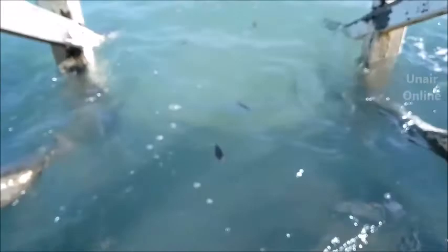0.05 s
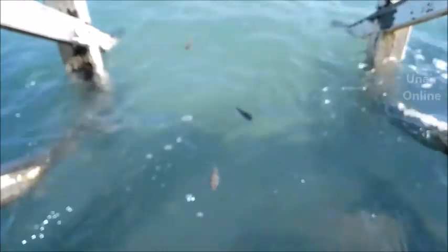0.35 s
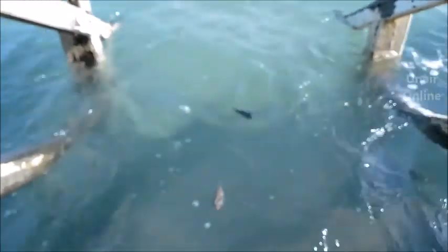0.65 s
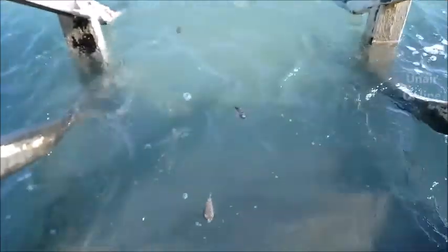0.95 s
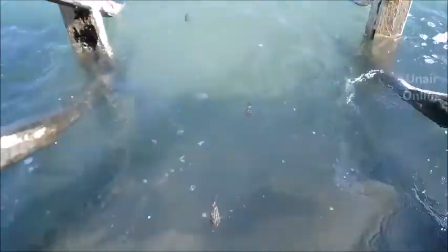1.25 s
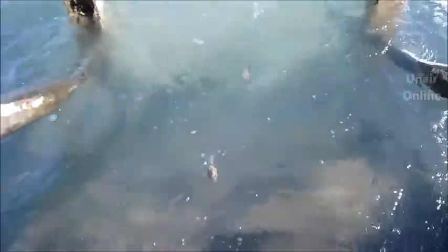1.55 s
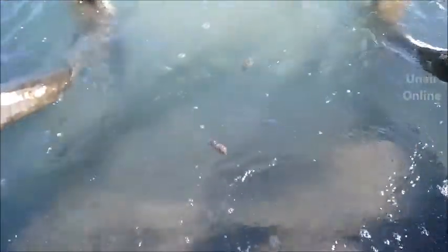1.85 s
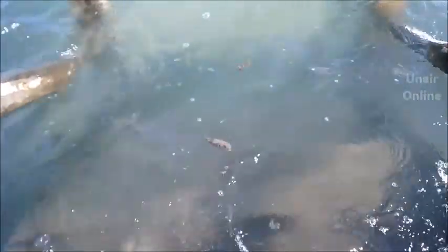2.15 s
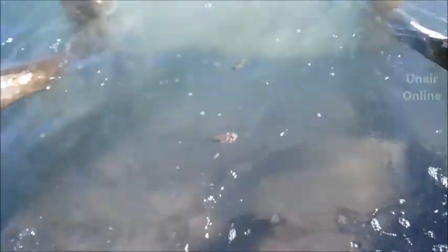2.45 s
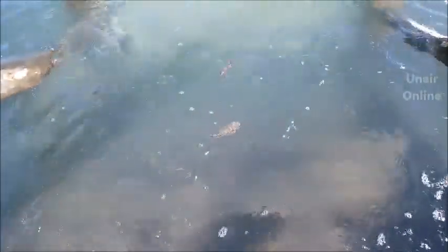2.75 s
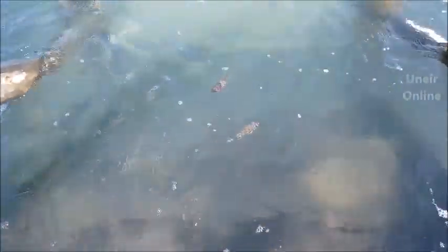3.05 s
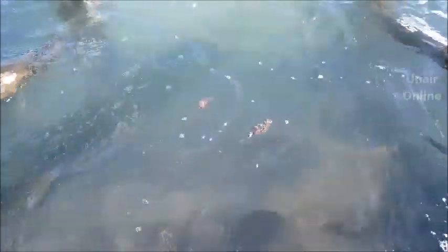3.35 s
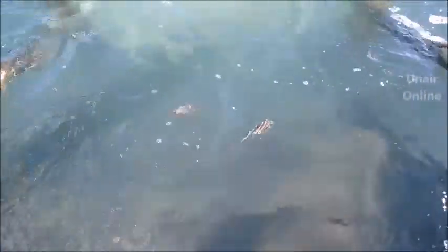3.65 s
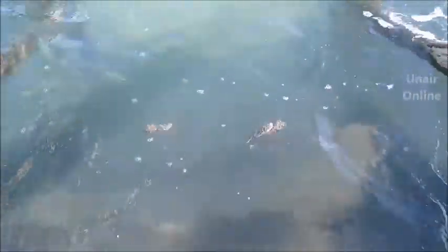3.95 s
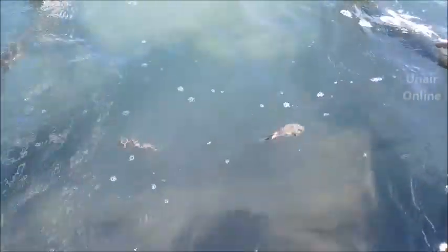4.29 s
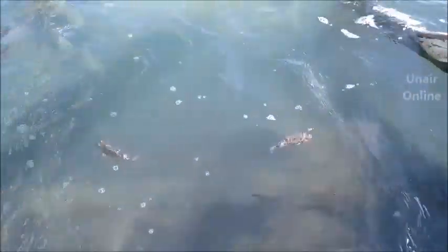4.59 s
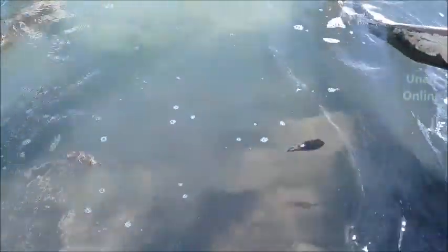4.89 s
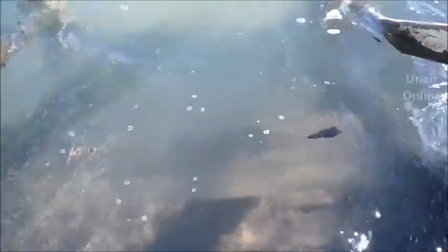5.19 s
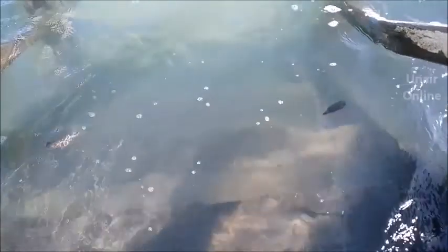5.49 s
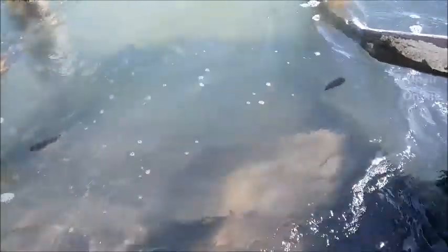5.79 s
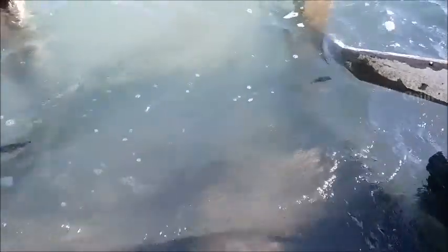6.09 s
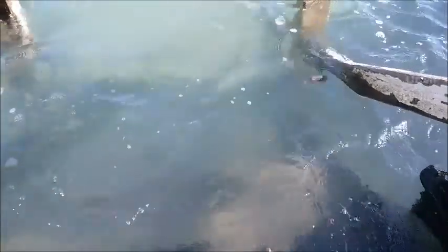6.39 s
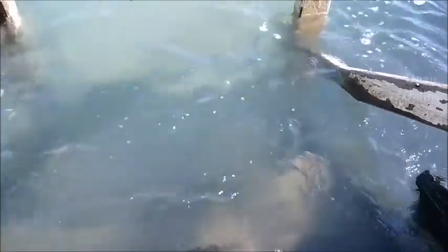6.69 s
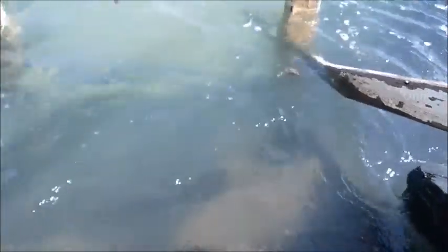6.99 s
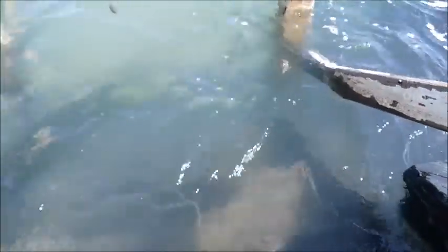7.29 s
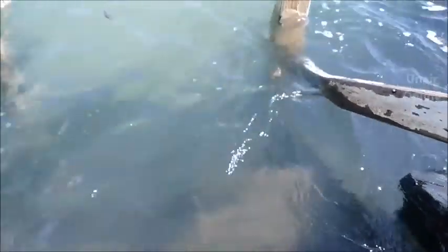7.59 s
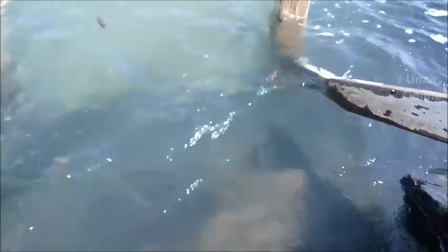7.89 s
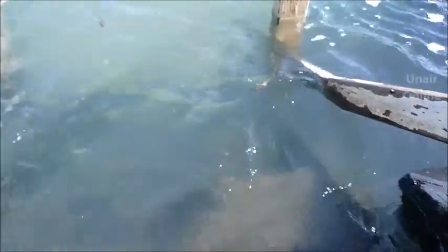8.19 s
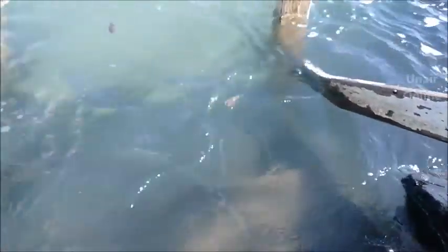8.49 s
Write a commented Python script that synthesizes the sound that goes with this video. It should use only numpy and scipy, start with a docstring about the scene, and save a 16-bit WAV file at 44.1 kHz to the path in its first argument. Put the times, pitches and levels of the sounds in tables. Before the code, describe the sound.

A wave washes around the wooden posts of a jetty, splashing and churning with sharp slaps, bubbly plops and a brief dull rumble. It drains away in fizzing foam after about two seconds. The sea then laps and trickles much more quietly, with small crests slapping the timber, gurgles and ticking drops. The water sounds close, with a short echo under the deck.

```python
"""A wave under a wooden jetty

A wave breaks around the posts, churns and drains away in fizzing foam. Then the sea laps and trickles:
small crests slap the timber, trapped air plops and gurgles, and spray drops tick.
Most of the sound is ringing bubbles, big ones low and small ones high. The deck echoes briefly."""
import sys
import numpy as np
from scipy import signal
from scipy.fft import rfft, irfft, next_fast_len
from scipy.io import wavfile
from scipy.ndimage import map_coordinates

SR = 44100
rng = np.random.default_rng(int(sys.argv[2]) if len(sys.argv) > 2 else 0)


def bounce(signal):
    """Save signal as a 16-bit WAV file at the path given by the first command-line argument."""
    frames = np.transpose(np.atleast_2d(signal))
    limited = np.clip(frames, -1, 1)
    pcm = np.round(limited * 32767).astype(np.int16)
    wavfile.write(sys.argv[1], SR, pcm)


N = 381024  # samples: 8.64 s


def amp(db):
    """Turn decibels into a gain to multiply by."""
    return 10 ** (np.asarray(db) / 20)


def unit(x):
    """Scale a sound to an average (rms) level of 1."""
    return x / np.sqrt(np.mean(x ** 2) + 1e-20)


def fade(t, fade_s):
    """Die away by 60 dB in fade_s seconds, the fade time."""
    return np.exp(-np.log(1000) * t / fade_s)


def along(points, hz):
    """Read between (frequency, value) points, with octaves evenly spaced."""
    frequencies, values = np.transpose(points)
    return np.interp(np.log(hz + 1), np.log(frequencies + 1), values)


def curves(rows):
    """Turn each column after the time into one value per sample."""
    times, *columns = np.transpose(rows)
    return [np.interp(np.arange(N) / SR, times, column) for column in columns]


def wobble(per_second):
    """A smooth curve through this many random values a second."""
    values = rng.standard_normal(int(N * per_second / SR) + 4)
    return map_coordinates(values, [np.arange(N) * per_second / SR])


def filtered(x, response):
    """Multiply each frequency in a sound by the gain response(hz)."""
    size = next_fast_len(len(x) + SR // 8)
    return irfft(rfft(x, size) * response(np.fft.rfftfreq(size, 1 / SR)), size)[:len(x)]


def coloured(x, tone):
    """Shape a sound with a table of frequencies and levels, then scale it to level 1."""
    return unit(filtered(x, lambda hz: amp(along(tone, hz))))


def without_bass(x, corner_hz=330):
    """Cut the bass, so splashes sound light and have no low thud."""
    return filtered(x, lambda hz: hz ** 4 / (hz ** 4 + corner_hz ** 4))


def add(track, start_s, sound):
    """Mix a sound into the track at the given time."""
    part = track[max(0, round(start_s * SR)):][:len(sound)]
    part += sound[:len(part)]


def ring(t, hz, fade_s, rise, onset_cycles):
    """A bubble swells, fades, and climbs about `rise` octaves per fade time as it nears the surface."""
    age = np.minimum(t / fade_s, 2)
    swell = 1 - np.exp(-(t * hz / onset_cycles) ** 2)
    return swell * fade(age, 1) * np.sin(2 * np.pi * hz * t * 2 ** (rise * age / 2))


def swarm(count, low_hz, high_hz, cycles, spread_db, rise, samples):
    """Bubbles of random pitch, life and strength, scattered over the whole scene."""
    when, pitch, life, strength, climb = rng.random((count, 5)).T[:, :, None]
    hz = low_hz * (high_hz / low_hz) ** pitch
    fade_s = cycles * 2 ** (2 * life - 1) / hz
    gain = amp(spread_db * np.minimum(-np.log(1 - strength), 4)) * hz
    rings = gain * ring(np.arange(samples) / SR, hz, fade_s, rise * climb, onset_cycles=0.79)
    positions = (when * N).astype(int) + np.arange(samples)
    return unit(np.bincount(positions.ravel(), rings.ravel(), N)[:N])


def froth(bubbles, tone, wash_db, flutter_db):
    """Distinct bubbles over a noisy wash of countless small ones, arriving in clumps."""
    wash = amp(wash_db)
    mix = coloured(bubbles, tone) + wash * coloured(rng.standard_normal(N), tone)
    mix /= np.sqrt(1 + wash ** 2)  # keeps the level steady as the wash changes
    return unit(mix * amp(flutter_db * wobble(70)))


def breaker(level_db, drained_s, steepness, crest_s=0.4, slosh_s=0.61):
    """Gain of a wave layer: it swells, sloshes and sags, and drains 20 dB more by drained_s."""
    t = np.arange(N) / SR
    swell_db = -10 * np.maximum(1 - t / crest_s, 0)
    sag_db = -2.5 * np.maximum(t - crest_s, 0)
    slosh_db = 0.57 * np.cos(2 * np.pi * (t - crest_s) / slosh_s)  # rocking between the posts
    drain_db = -20 * np.minimum(t / drained_s, 2) ** steepness
    return amp(level_db + swell_db + sag_db + slosh_db + drain_db)


# How long the echo under the deck lasts: (frequency [Hz], fade time [s])
DECK_FADES = [(200, 0.48), (2000, 0.28), (6000, 0.41), (14000, 0.042)]
def deck_echo(x, delay_s=0.006):
    """Sound bounces briefly between the water and the planks."""
    hz, t, bands = signal.stft(rng.standard_normal(SR // 2), SR, nperseg=256)
    tail = signal.istft(bands * fade(t, along(DECK_FADES, hz)[:, None]), SR, nperseg=256)[1]
    delayed = np.pad(x, (round(delay_s * SR), 0))
    return signal.fftconvolve(delayed, tail / np.linalg.norm(tail))[:N]


# The weight of the water against the posts: (time [s], level [dB])
SURGE = [(0.0, -77), (0.55, -75.5), (1.23, -59), (1.32, -75), (1.76, -71), (1.95, -81), (4.3, -85),
         (4.7, -75), (5.1, -87), (8.64, -91)]
# The deep tone of that push: (frequency [Hz], relative level [dB])
RUMBLE_TONE = [(20, 2), (45, -0.5), (70, 11.5), (125, 13.5), (200, -22), (400, -27)]
def rumble(heave_db=2.8):
    """Moving water pushes on the posts with a dull rumble."""
    level_db = curves(SURGE)[0] + heave_db * wobble(14)
    return amp(level_db) * coloured(rng.standard_normal(N), RUMBLE_TONE)


# The tone of the finest foam: (frequency [Hz], relative level [dB])
SIZZLE_TONE = [(5000, -40), (8000, -26), (10000, -15.5), (11300, 5), (12100, 6), (13200, -5),
               (16000, -13.5)]
def sizzle():
    """The finest foam goes on sizzling just after the wave's spray has fallen."""
    bursts = swarm(9000, low_hz=9650, high_hz=14200, cycles=30, spread_db=5.5, rise=0.1, samples=150)
    foam = froth(bursts, SIZZLE_TONE, wash_db=3, flutter_db=2.5)
    return foam * breaker(level_db=-35, drained_s=1.68, steepness=24)


def drips(below_ripples_db=9):
    """Water running off the posts plinks, louder when the ripples are higher."""
    plinks = swarm(150, low_hz=481, high_hz=3400, cycles=28, spread_db=2, rise=0.86, samples=3600)
    return plinks * amp(curves(LAPPING)[0] - below_ripples_db)


# Drops landing close by: (time [s], relative peak level [dB])
DROPS = [(2.705, -34), (2.792, -25), (2.9448, -31), (4.2127, -26), (4.274, -10), (4.282, -20),
         (4.5265, -17), (4.646, -30), (5.232, -26), (6.3715, -24.5), (6.3919, -18.5), (6.6543, -32),
         (7.1957, -29)]
def drops(tick_hz=12200, fade_s=0.0016):
    """Each drop lands with a tiny bright tick and a puff of spray."""
    out, t = np.zeros(N), np.arange(SR // 100) / SR
    for start_s, db in DROPS:
        hz = tick_hz * np.exp(0.017 * rng.standard_normal())
        tick = ring(t, hz, fade_s, rise=0.11, onset_cycles=0.3)
        tick += 0.15 * coloured(rng.standard_normal(len(t)), SPRAY_TONE) * fade(t, 2 * fade_s)
        add(out, start_s, amp(db) * tick / np.abs(tick).max())
    return out


# Escaping air: (time [s], length [s], level [dB], first pitch [Hz], last pitch [Hz])
GURGLES = [(0.739, 0.15, -33, 270.5, 277), (1.802, .14, -39.5, 400, 430), (2.547, 0.063, -47.5, 1000, 1360),
           (2.897, 0.079, -55.5, 360, 490), (4.287, .09, -45, 710, 780), (4.53, 0.27, -56.5, 315, 271)]
def gurgles(per_second=110, pitch_scatter=0.162, cycles=18):
    """A pocket of air breaks into a quick run of bubbles of about one size."""
    out, t = np.zeros(N), np.arange(SR // 8) / SR
    for start_s, length_s, db, first_hz, last_hz in GURGLES:
        run, count = np.zeros(SR), max(2, round(length_s * per_second))
        for k, (late, detune, strength) in enumerate(rng.standard_normal((100, 3))[:count]):
            progress = (k + 0.269 * late) / count
            hz = first_hz * (last_hz / first_hz) ** progress * np.exp(pitch_scatter * detune)
            bubble = ring(t, hz, cycles / hz, rise=0.19, onset_cycles=6.5)
            add(run, progress * length_s, amp(2 * strength) * bubble)
        add(out, start_s, amp(db) * unit(run) * np.sqrt(length_s))
    return out


# Notes of the gap between water and beam: (pitch [Hz], width [Hz], relative level [dB])
GAP_NOTES = [(2300, 320, 1), (3340, 290, -6)]
def gap_ring(x, fade_s=0.59):
    """The narrow gap between water and beam rings on after each pop."""
    def peaks(hz):
        return sum(amp(db) / (1 + (2 * (hz - pitch) / width) ** 2) for pitch, width, db in GAP_NOTES)
    t = np.arange(SR // 3) / SR
    tail = filtered(rng.standard_normal(len(t)), peaks) * fade(t, fade_s)
    return signal.fftconvolve(x, tail / np.linalg.norm(tail))[:N]


# Air pinched against the timber: (time [s], peak level [dB], pitch [Hz], fade time [s])
POPS = [(.352, -12.5, 3050, 0.018), (.925, -16, 3360, .03), (2.018, -38, 3260, 0.029),
        (2.304, -36, 2400, .02), (2.502, -39, 3180, 0.037), (3.576, -22, 3770, 0.02),
        (3.662, -38, 1730, 0.037), (4.056, -35, 2580, 0.05), (4.082, -34, 2770, 0.033),
        (4.236, -24, 2190, .018), (4.256, -27, 2810, 0.017), (4.429, -22, 2100, 0.032),
        (4.502, -19.5, 2080, 0.012), (4.526, -21, 3170, 0.015), (6.171, -38, 3150, 0.03)]
def pops(roughness=0.11):
    """Air caught between a ripple and the timber pops with a short, hollow note."""
    out, t = np.zeros(N), np.arange(SR // 10) / SR
    for start_s, db, hz, fade_s in POPS:
        note = ring(t, hz, fade_s, rise=0.077, onset_cycles=3.5)
        add(out, start_s, amp(db) * note / np.abs(note).max())
    return out * (1 + roughness * wobble(400))


# Single bubbles close by: (time [s], peak level [dB], pitch [Hz], rise [octaves per fade time])
PLOPS = [(.389, -13.5, 2410, 0.85), (.409, -21, 686, 0.22), (.456, -7.5, 1625, 0.15),
         (.495, -27.5, 430, .1), (.537, -14.5, 865, 0.1), (.568, -23, 727, 0.22), (.608, -21, 715, 0.34),
         (.770, -20, 700, 0.12), (.836, -23, 680, .3), (.848, -27, 341, .2), (1.192, -26.5, 254, 0.1),
         (1.221, -21, 1006, 0.19), (1.455, -29.5, 440, .1), (1.586, -27, 314, 0.11), (2.203, -43, 1480, .4),
         (2.593, -39.5, 783, 0.17), (2.991, -32.5, 762, 0.55), (4.23, -33, 745, 0.07),
         (4.384, -35.5, 750, .1), (4.555, -45, 315, .1), (4.611, -39, 264, .1), (4.704, -45, 258, .1),
         (4.793, -45, 317, .1), (4.815, -44.5, 228, .1), (4.9, -44, 1000, .15), (5.216, -29, 5400, 0.037),
         (5.230, -36, 447, 0.2), (5.254, -35.5, 492, 0.53), (5.478, -45, 567, 0.095),
         (5.574, -41, 946, 0.28), (6.389, -33.5, 557, 0.16), (6.438, -29, 588, 0.25),
         (6.717, -44, 1260, 0.57), (6.917, -43, 787, 0.67), (7.234, -46.5, 354, .1),
         (7.363, -37.5, 930, 0.17)]
def plops(roughness=0.29, longest_fade_s=0.087, big_bubble_hz=610):
    """Bubbles ring one by one, wobbling as they change shape; small, high ones die sooner."""
    out, t = np.zeros(N), np.arange(SR // 4) / SR
    for start_s, db, hz, rise in PLOPS:
        fade_s = longest_fade_s * min(1, big_bubble_hz / hz)
        bubble = ring(t, hz, fade_s, rise, onset_cycles=2.3)
        add(out, start_s, amp(db) * bubble / np.abs(bubble).max())
    return out * (1 + roughness * wobble(210))


def off_post(x, delay_s=0.0016, reflection_db=-8):
    """A sound together with its bounce off the nearest post."""
    return x + amp(reflection_db) * np.pad(x, (round(delay_s * SR), 0))[:N]


# Steady notes that ring in every slap: (pitch [Hz], width [Hz], relative level [dB])
SLAP_NOTES = [(740, 170, 15), (1060, 100, 0), (1563, 124, 11.5), (2140, 210, 8.5), (3260, 80, -2),
              (3800, 680, 2.5), (5500, 740, 10.5)]
def air_pocket(noise, pocket_hz, width_octaves, bass_cut_hz=450):
    """Shattered air makes a band of noise, coloured by a set of steady ringing notes."""
    def response(hz):
        band = 1 / np.sqrt(1 + np.abs(np.log2((hz + 1) / pocket_hz) / width_octaves) ** 4.84)
        ringing = sum(amp(db) ** 2 / (1 + (2 * (hz - pitch) / width) ** 2)
                     for pitch, width, db in SLAP_NOTES)
        bass_cut = hz ** 6 / (hz ** 6 + bass_cut_hz ** 6)
        return band * np.sqrt(0.51 + ringing) * bass_cut  # 0.51 is the power that arrives directly
    return unit(filtered(noise, response))


# Crests hitting the timber: (time [s], relative smack level [dB], air pocket pitch [Hz],
# pocket band width [octaves], relative spray level [dB], fade time [s])
SLAPS = [(.108, -13, 2120, 0.69, -25.5, 0.22), (.125, -15, 2400, 1, -12.5, 0.092),
         (0.187, -5, 2400, 0.48, -13, 0.1), (.21, -16, 2100, 0.49, -12.5, 0.059),
         (.349, -7, 2630, 0.67, -13, 0.075), (.368, -5.5, 1800, 1, -11, 0.035),
         (.541, -5, 2100, 0.28, -15, 0.059), (.61, -12, 1900, .5, -26, 0.044),
         (.762, -8, 1890, 0.56, -12, 0.045), (0.926, -11, 2430, 0.55, -21, 0.23),
         (1.029, -9.5, 2400, 0.51, -16, 0.12), (3.201, -24.5, 3040, 0.42, -33.5, 0.051),
         (3.556, -25.5, 1750, 0.47, -35, 0.16), (3.556, -23, 3850, 0.15, -51, 0.057),
         (3.57, -24, 950, 0.42, -42, 0.038), (3.576, -15, 3720, 0.14, -26.5, 0.064),
         (3.576, -17, 2400, 0.22, -42, 0.066), (3.606, -31, 1980, .35, -42, 0.29),
         (3.881, -49, 1840, .5, -34.5, 0.031), (4.044, -22.5, 1740, 0.87, -33, 0.087),
         (4.2, -33.5, 1800, 0.76, -36, 0.21), (4.222, -26, 1850, 0.69, -29, .04),
         (4.227, -12, 1540, 0.73, -29, 0.061), (4.254, -13, 2600, 0.26, -25, 0.038),
         (4.266, -19, 3320, 0.27, -29, 0.047), (4.272, -23, 1100, 0.88, -19, 0.04),
         (4.302, -29, 4100, 0.14, -29, .045), (4.429, -15.5, 1550, 0.79, -35, 0.051),
         (4.502, -17, 2560, 0.29, -31, 0.037), (4.566, -20.5, 1900, 0.35, -37, 0.079),
         (4.582, -27.5, 1240, 0.32, -50, 0.044), (4.71, -22.5, 2080, 0.37, -45, 0.16),
         (5.208, -29, 2260, 0.94, -33, 0.06), (5.225, -22.5, 1200, 1, -21.5, 0.03),
         (6.183, -32, 2100, .5, -31, 0.057), (6.385, -22.5, 1660, 0.25, -25.5, 0.023),
         (6.492, -29.5, 1850, .25, -45, 0.081), (6.548, -25, 2300, 0.38, -39.5, 0.074),
         (6.633, -30, 1800, .3, -42, .07), (7.361, -26, 1170, 0.4, -31.5, 0.065),
         (7.525, -37, 1210, 0.5, -59, 0.054), (7.793, -40, 1780, 0.46, -51, .07),
         (8.18, -43.5, 850, 1, -58, 0.15), (8.57, -35.5, 1730, .35, -50, 0.064)]
def slaps(smack_attack_s=0.00096, spray_attack_s=0.0018, smack_gain_db=-9, spray_gain_db=-2, grain_db=5):
    """Each crest shatters a pocket of air against the wood; spray follows and water spatters back."""
    out, t = np.zeros(N), np.arange(SR // 4) / SR
    spatter = amp(-17) * fade(t, fade_s=0.11)
    for start_s, smack_db, pocket_hz, width_octaves, spray_db, fade_s in SLAPS:
        air, mist = rng.standard_normal((2, len(t)))
        pocket = air_pocket(air, pocket_hz, width_octaves)
        droplets = coloured(mist * amp(grain_db * rng.standard_normal(len(t))), SPRAY_TONE)
        burst = fade(t, fade_s)
        smack = pocket * (1 - np.exp(-t / smack_attack_s)) * np.hypot(burst, spatter)
        fizz = droplets * (1 - np.exp(-t / spray_attack_s)) * burst
        add(out, start_s, amp(smack_db + smack_gain_db) * smack + amp(spray_db + spray_gain_db) * fizz)
    return out


def tumble():
    """Inside the breaking wave, lumps of water fall back with short, distinct glugs."""
    glugs = swarm(640, low_hz=463, high_hz=1710, cycles=14.4, spread_db=0.5, rise=0.37, samples=2400)
    return without_bass(glugs) * breaker(level_db=-33, drained_s=1.86, steepness=4)


def backwash(level_db=-35, peak_s=1.707, spread_s=0.035):
    """Gain of the last gush, as the spent wave pours back off the timber."""
    return amp(level_db - np.minimum(((np.arange(N) / SR - peak_s) / spread_s) ** 2, 100))


# Tones of large, medium, small and tiny bubbles: (frequency [Hz], relative level [dB])
CHURN_TONE = [(130, -62), (180, -15), (245, -4.5), (330, 0.5), (560, 0.5), (750, -9.5), (1200, -6),
              (2500, -66)]
SPLASH_TONE = [(60, -82), (300, -26.5), (550, -3), (780, -2), (1100, -2), (1650, -0.5), (2300, -2.5),
               (3200, -18.5), (4500, -43), (7000, -42)]
TRICKLE_TONE = [(300, -83), (1500, -28), (2400, 0.5), (3100, -1.5), (3900, -2), (4700, -7.5), (6000, -9.5),
                (9000, -59.5)]
SPRAY_TONE = [(300, -79), (3000, -10.5), (5000, -12.5), (7000, -9.5), (9000, -7), (10500, -3.5),
              (12000, -1), (13500, -5), (16000, -13)]
# The sea lapping after the wave: (time [s], relative ripple level [dB], relative foam level [dB])
LAPPING = [(1.95, -49, -47.5), (2.68, -53, -51), (3.08, -51, -51), (3.37, -54, -52.5), (4.05, -53, -51.5),
           (4.43, -51.5, -50), (4.78, -53, -55.5), (5.25, -53.5, -52.5), (5.69, -52.5, -49.5),
           (5.96, -50, -50.5), (6.23, -50.5, -49), (6.74, -51.5, -49.5), (7.24, -50.5, -52),
           (7.48, -53.5, -56.5), (8.23, -63, -59.5), (8.64, -59.5, -58)]
def wave_and_lapping():
    """Big bubbles churn, smaller ones splash and trickle, spray fizzes; the finest drain away first."""
    ripples_db, foam_db = curves(LAPPING)
    calm, = curves([(1.7, 0.37), (2.1, 1)])  # as the wave drains, single bubbles stand out
    stir_db = wobble(30) * (0.37 + 0.94 * calm)

    large = swarm(1300, low_hz=228.6, high_hz=924, cycles=59, spread_db=3.5, rise=0.86, samples=3600)
    medium = swarm(2000, low_hz=658.5, high_hz=3148, cycles=47.6, spread_db=2, rise=0.93, samples=1800)
    small = swarm(1900, low_hz=2169, high_hz=7110, cycles=78, spread_db=2.5, rise=0.46, samples=800)
    tiny = swarm(10000, low_hz=4550, high_hz=15550, cycles=38, spread_db=3, rise=0.29, samples=128)
    churn = froth(large, CHURN_TONE, wash_db=-4.8 * calm, flutter_db=2)
    splash = froth(medium, SPLASH_TONE, wash_db=7 - 3.5 * calm, flutter_db=1.5)
    trickle = froth(small, TRICKLE_TONE, wash_db=5 - 4 * calm, flutter_db=2.5)
    spray = froth(tiny, SPRAY_TONE, wash_db=8 - 3.2 * calm, flutter_db=2.1)

    # Each layer follows the wave, then settles to the lapping; hypot adds their powers.
    churn *= np.hypot(breaker(level_db=-33.5, drained_s=1.955, steepness=26), amp(ripples_db - 7))
    wave_and_gush = np.hypot(breaker(level_db=-24, drained_s=1.84, steepness=7.6), backwash())
    splash *= np.hypot(wave_and_gush, amp(ripples_db - 1.5))
    halfway_db = (ripples_db + foam_db) / 2
    trickle *= np.hypot(breaker(level_db=-27.5, drained_s=1.705, steepness=10), amp(halfway_db - 6))
    spray *= np.hypot(breaker(level_db=-23.1, drained_s=1.537, steepness=7), amp(foam_db - 0.5))
    return amp(stir_db) * (churn + splash + trickle + spray)


def scene(hit_echo_db=-11, bubble_echo_db=-14, drop_gain_db=3, gap_db=-24):
    """All the water heard from one spot, alike in both channels; slaps and drops echo most."""
    hits = without_bass(off_post(slaps()) + amp(drop_gain_db) * drops())
    popping = pops()
    bubbles = plops() + gurgles() + drips() + popping
    echo = deck_echo(amp(hit_echo_db) * hits + amp(bubble_echo_db) * bubbles)
    echo += amp(gap_db) * gap_ring(popping)
    mono = wave_and_lapping() + tumble() + sizzle() + rumble() + hits + bubbles + echo
    return np.array([mono, mono])


def record(dry):
    """Cut away the very highest treble."""
    top_hz = 15900
    return np.array([filtered(channel, lambda hz: hz < top_hz) for channel in dry])


dry = scene()
out = record(dry)
bounce(out)
```